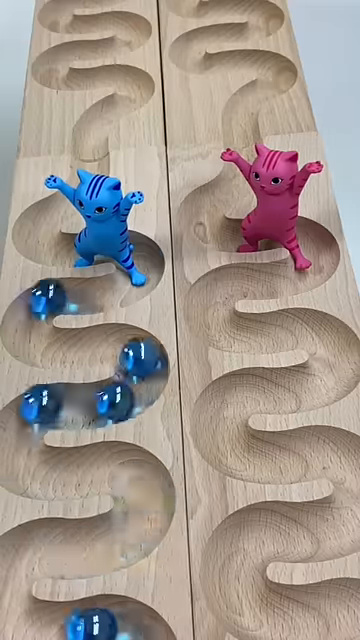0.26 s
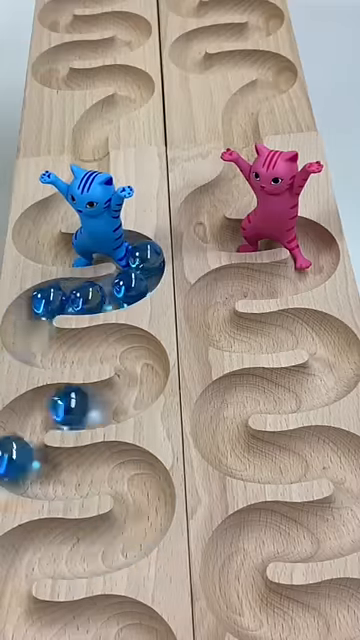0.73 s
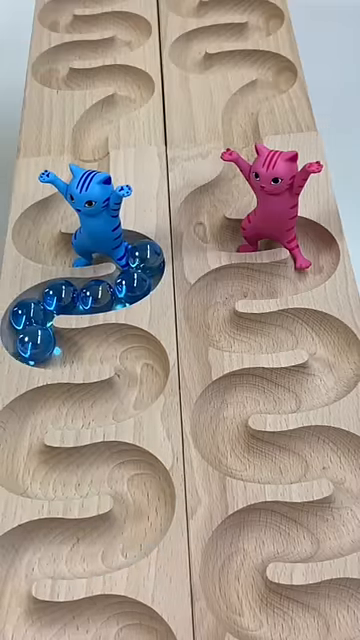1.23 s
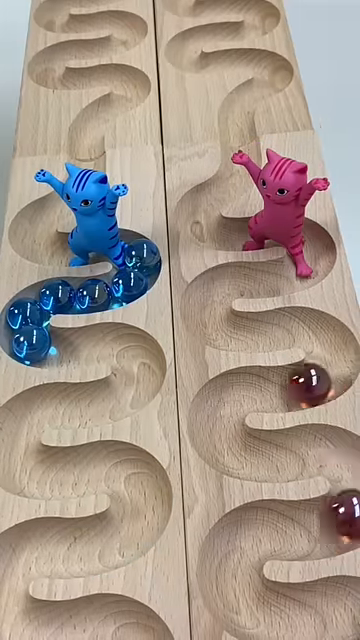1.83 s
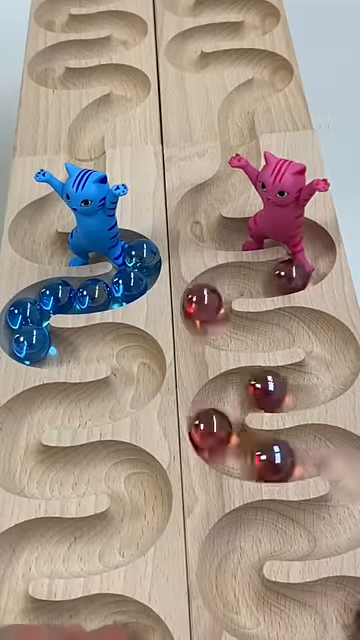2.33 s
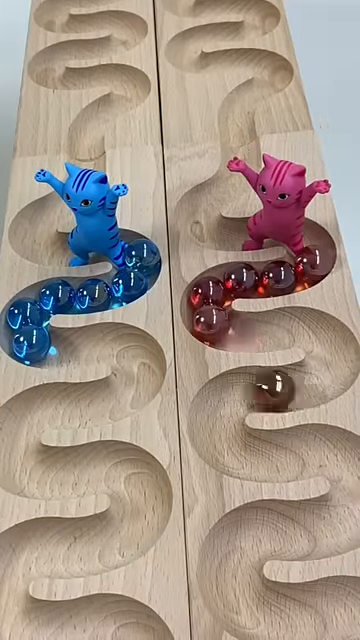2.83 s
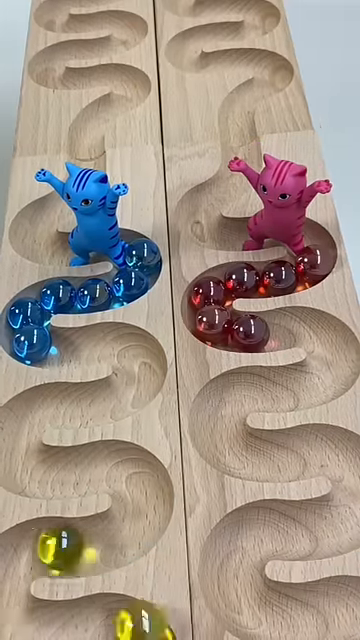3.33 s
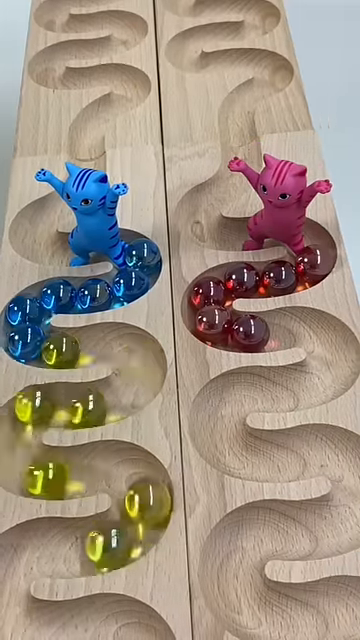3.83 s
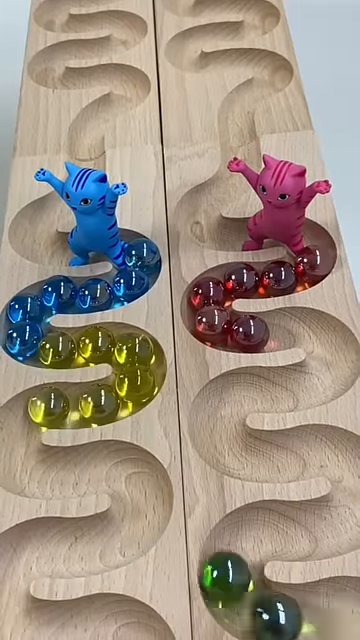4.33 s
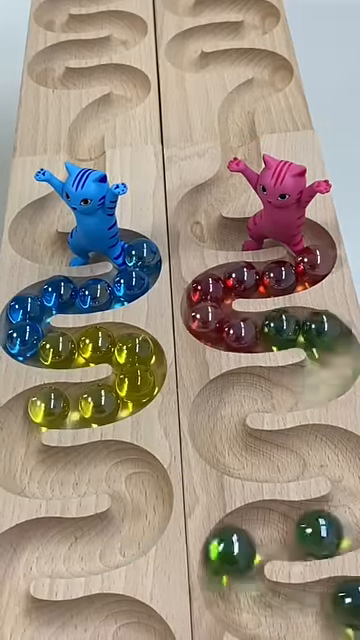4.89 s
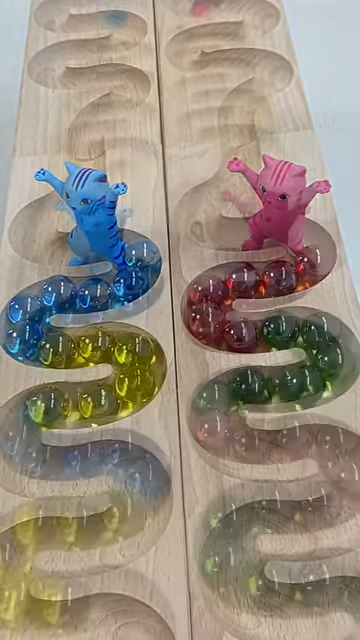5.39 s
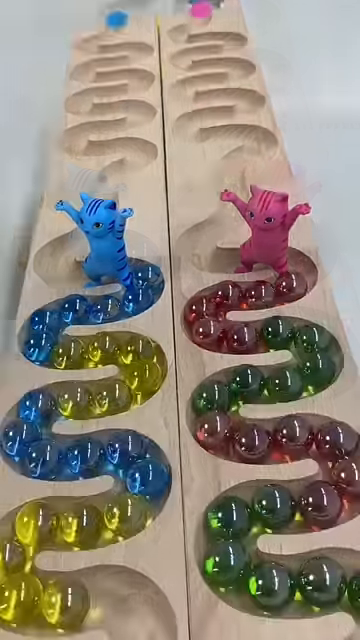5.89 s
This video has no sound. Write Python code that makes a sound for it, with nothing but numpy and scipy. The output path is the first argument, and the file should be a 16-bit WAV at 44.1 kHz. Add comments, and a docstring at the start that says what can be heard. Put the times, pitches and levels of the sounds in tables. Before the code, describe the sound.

Glass marbles roll down snaking grooves in wooden boards, making a hollow woody rumble covered in dense, bright chatter. Sharp knocks against groove walls and small glass-on-glass clacks punctuate each run. The rolling stops briefly after the first run and dips again midway, then resumes. Four heavier slaps come near the end before it fades to soft room tone with faint low hums. Close stereo microphone, small dry room.

```python
"""Glass marbles roll down grooves in two wooden boards, left and right in turn, rumbling and chattering.
Random clicks stand for the wood grain and small hops; they ring the boards' bending modes and thin groove walls.
Knocks on the walls and clacks of glass on glass add cracks and decaying rings; four slaps come late.
The rolling then dies away into room tone with two short low hums. A close pair of microphone ports listens."""
import sys
import numpy as np
from scipy import signal
from scipy.fft import rfft, irfft, next_fast_len
from scipy.io import wavfile

SR = 44100
rng = np.random.default_rng(int(sys.argv[2]) if len(sys.argv) > 2 else 0)


def decibels_to_gain(level_db):
    """Convert a level in decibels to a linear amplitude gain (20 dB per decade)."""
    exponent = np.asarray(level_db, float) / 20
    return 10 ** exponent


def master_out(mix):
    """Clip the mix to full scale and print it as 16-bit PCM to the path in sys.argv[1]."""
    frames = np.transpose(np.atleast_2d(mix))
    ceiling = np.clip(frames, -1, 1)
    pcm = np.round(ceiling * 32767).astype(np.int16)
    wavfile.write(sys.argv[1], SR, pcm)


N = 271215

# Room tone while the marbles roll. Each row: frequency in Hz, relative density in dB.
ROOM_TONE = [(25, -54.5), (65, -48.5), (110, -16.5), (300, -18), (650, -22), (1500, -34.5), (14000, -53.5)]
# Deeper room tone at the end. Each row: frequency in Hz, relative density in dB.
LATE_TONE = [(18, -12), (130, -11), (330, -18), (1190, -36.5), (14000, -49.5)]
ROOM_TONE_DB, LATE_TONE_DB = -60, -58  # rms levels
TONE_TURN_S = 5.45  # middle of the crossfade between the two tones
# Likeness of left and right room tone. Each row: frequency in Hz, correlation from 0 to 1.
TONE_LIKENESS = [(200, 0.99), (1000, 0.99), (15000, 0.39)]
# Wavering hum in the first room tone: frequency in Hz, width in Hz, rms level in dB.
WAVERING_HUM = (111, 18, -58.5)
# Low hums at 56 Hz. Each row: start in seconds, end in seconds, peak level in dB.
LOW_HUMS = [(5.801, 5.95, -52), (5.987, 6.135, -50.5)]
# Decay of the small room. Each row: frequency in Hz, time to fall 60 dB in seconds.
ROOM_DECAY = [(200, 0.068), (2000, 0.02), (12000, 0.2)]

# Times when the right board is in play, else the left. Each row: start in seconds, end in seconds.
RIGHT_BOARD_SPANS = [(1.3, 3.01), (4.15, 7)]
# Bending modes shared by both boards. Each row: frequency in Hz, relative level in dB,
# time to fall 60 dB when struck in seconds.
BODY_MODES = [(208.4, -7.5, 0.039), (308.5, -3, 0.061), (377.2, -7.5, 0.096), (448.8, -6.5, 0.054),
              (650, -9, 0.058), (852.7, -15, 0.13), (1147, -5, 0.027), (1335, -11.5, 0.081),
              (2024, -3.5, 0.019), (2354, -13, 0.0075)]
# Short rings of the thin groove walls, a list for the left board and one for the right.
# Each row: nominal frequency in Hz, relative level in dB, time to fall 60 dB in seconds.
WALL_RINGS = [
    [(2590, 1.5, 0.0059), (3280, -1, 0.0073), (4910, 0.5, 0.0055), (5530, -9.5, 0.024), (6750, 5.5, 0.0077),
     (8000, -13.5, 0.011), (9790, -4.5, 0.012)],
    [(2998, -2, 0.017), (3307, 3, 0.0037), (4070, 4, 0.003), (5630, 7.5, 0.0034), (6240, -3.5, 0.01),
     (8620, -4, 0.0067), (9320, -1, 0.012), (11900, -11.5, 0.0084)],
]

# Hard blows on a groove wall. Each row: start in seconds, knock drive in dB,
# ring frequency of the spot struck in Hz, drive of that ring in dB, drive of the high rings in dB.
BLOWS = [(0.1493, -11.5, 5530, -1, -4.5), (0.1774, -17.5, 5530, -8.5, -15.5),
         (1.3356, -20.5, 6100, -14, -17.5), (1.3435, -22, 5200, -18, -32.5),
         (1.5275, -11.5, 5360, -6, -4.5), (1.5648, -15.5, 6530, -3, -2), (1.589, -19.5, 5630, -5.5, -25.5),
         (1.6024, -20.5, 6530, -4, -8), (1.776, -19.5, 5630, -14, -14.5), (1.783, -22, 5150, -7, -16.5),
         (1.8214, -19.5, 5870, -13, -17.5), (2.1761, -15, 5740, -21.5, -31.5),
         (2.1834, -25, 5630, -15, -27.5), (3.0907, -20, 6750, -17, -13), (3.097, -21.5, 5910, -6.5, -10.5),
         (3.307, -12, 5780, 1.5, -9), (3.3116, -9.5, 5570, -15.5, -15), (3.327, -25, 5800, -5, -10.5),
         (3.335, -22, 6860, -15.5, -11.5), (3.351, -27, 5730, -2, -2.5), (3.3649, -18, 5680, -6.5, -34),
         (3.3819, -13, 5900, -1.5, -6.5), (3.4218, -21.5, 5670, -12, -26.5),
         (3.4424, -15, 5530, -10.5, -14.5), (3.4725, -23.5, 5720, -10.5, -21.5),
         (3.4797, -23, 5630, -13, -19.5), (4.132, -19.5, 6650, -16, -22), (4.1643, -19.5, 6580, -7, -18.5),
         (4.1761, -20, 6700, -5.5, -12.5), (4.195, -22, 6500, -11.5, -21.5),
         (4.2059, -24.5, 6480, -12, -23), (4.5938, -18, 5630, -7.5, -8.5), (4.6062, -17, 7030, -2, -26),
         (4.615, -19.5, 5630, -24, -20), (4.629, -21.5, 5530, -18, -24), (4.8123, -7, 4620, -2.5, 3.5),
         (4.9293, -5, 4240, -1, 1), (4.9939, -11.5, 4670, -5, 1), (5.03, -17, 4390, -11.5, -9.5)]
TICK_SLOPE, TICK_DB = 0.26, -26  # tick drive of a blow: dB per dB of high ring, dB at 0 dB high ring
# Marble clacks on marble. Each row: start in seconds, clack drive in dB, groove ring drive in dB.
CLACKS = [(0.5292, -25.5, -19.5), (0.5507, -33.5, -32), (0.5793, -26.5, -22), (0.604, -21, -23.5),
          (1.009, -31.5, -49), (1.039, -35.5, -45), (1.0514, -25.5, -45), (1.078, -25.5, -34),
          (1.4544, -28, -45), (1.4634, -32.5, -50), (1.909, -35, -26), (1.9939, -34.5, -28.5),
          (2.605, -24.5, -42), (2.677, -29, -45), (2.7075, -23, -20), (2.7259, -28, -29),
          (3.023, -28.5, -50), (3.0408, -25.5, -40), (3.0614, -25.5, -31), (3.838, -33, -45),
          (3.859, -31.5, -31), (3.97, -32.5, -48), (3.9826, -23, -60), (4.0483, -29, -47),
          (4.1013, -23, -37), (4.1208, -19.5, -22), (4.586, -29, -48), (4.88, -35.5, -47),
          (4.9095, -23.5, -39), (4.924, -25, -38), (5.05, -24, -14), (5.27, -35, -43), (5.308, -27, -34),
          (5.3891, -30.5, -41)]
CLACK_HZ, CLACK_HIGH_DB = 4800, -14  # ring favoured by a clack; its high rings relative to that ring

# Briskness of the rolling. Each row: time in seconds, pace in dB below or above full pace.
PACE = [(0, 0.5), (.62, -1), (.72, -3), (.9, -1), (1.09, -5), (1.14, -71), (1.32, -8.5), (1.55, -3),
        (2.05, -0.5), (2.4, -0.5), (2.54, -2), (2.62, 0), (2.76, -3), (2.9, -6), (3.02, -5), (3.13, -3),
        (3.21, -18.5), (3.28, -0.5), (4.05, -0.5), (4.25, -5), (4.4, -1), (4.46, -4.5), (4.72, -2),
        (5.34, -1.5), (5.45, -14), (5.75, -24), (5.85, -48)]
# Small soft ticks, some just before a louder blow. Each row: time in seconds, relative level in dB.
SOFT_TICKS = [(0.074, -20.5), (0.1924, -16), (0.224, -19.5), (0.251, -24), (0.317, -22.5), (0.382, -17),
              (0.468, -30.5), (0.501, -20.5), (0.794, -28), (0.819, -28), (0.875, -25), (0.897, -25),
              (0.9185, -21.5), (1.327, -26), (1.4472, -29), (1.611, -17.5), (1.639, -18.5), (1.644, -24),
              (1.703, -20.5), (1.7925, -16), (1.828, -23.5), (1.8793, -26), (1.9614, -24.5), (2.1102, -30),
              (2.143, -35), (2.25, -42.5), (2.3245, -26), (2.383, -28), (2.41, -22), (2.4268, -26),
              (2.463, -26), (2.6313, -20.5), (2.798, -29), (2.806, -32), (2.853, -34), (2.859, -23),
              (2.903, -37.5), (2.936, -42), (2.954, -35.5), (2.972, -40), (3.0045, -25), (3.254, -35),
              (3.288, -19), (3.553, -25.5), (3.7593, -28), (3.823, -32.5), (3.928, -25.5), (3.7168, -16),
              (3.89, -22.5), (4.275, -27), (4.332, -24.5), (4.362, -24.5), (4.3833, -25.5), (4.426, -23.5),
              (4.4796, -29.5), (4.519, -28.5), (4.5695, -35.5), (4.685, -24), (4.753, -24), (5.109, -28.5),
              (5.15, -23.5), (5.285, -28), (5.402, -33)]
# Singing of the groove under rolling glass: frequency in Hz, time to fall 60 dB in seconds, mean gain in dB.
GROOVE_SONG = (3390, 0.01, -17.5)
RUMBLE_DB, CHATTER_DB, WHISPER_DB = -39.5, -49.5, -66  # drives at full pace
CHATTER_SLOPE = 3.23  # chatter dB per dB of pace: it dies faster than the rumble
STIR_DB, STIR_T60 = -40.5, 0.21  # rattling after a contact: dB relative to its knock, seconds to fall 60 dB

# Phase between the ports. Each row: frequency in Hz, lead of right over left in radians.
PORT_PHASE = [(300, 0), (3000, .15), (5200, -.4), (7000, -.2), (8700, -.7), (10600, -.45), (13600, -3.0)]
# Level between the ports. Each row: frequency in Hz, excess of left over right in dB.
PORT_LEAN = [(300, -.5), (1170, -1.8), (2000, -.4), (5000, .2)]


def evened(x):
    """Scales a signal to rms 1."""
    return x / np.sqrt(np.mean(x ** 2) + 1e-20)


def read(points, hz):
    """Reads a curve between its points along a logarithmic frequency axis."""
    f, value = np.transpose(points)
    return np.interp(np.log(hz + 1), np.log(f + 1), value)


def band(x, lo_hz, hi_hz):
    """Keeps one band of frequencies."""
    return signal.sosfilt(signal.butter(2, [lo_hz, min(hi_hz, SR / 2.1)], "band", fs=SR, output="sos"), x)


def ring(x, hz, t60):
    """A two-pole resonator: every click starts a decaying sine of about its own height."""
    r, w = np.exp(-np.log(1000) / (t60 * SR)), 2 * np.pi * hz / SR
    return signal.lfilter([0, np.sin(w)], [1, -2 * r * np.cos(w), r * r], x)


def glide(x, hz, t60):
    """Like ring, but the pitch follows the curve hz."""
    turn = np.exp(2j * np.pi * np.cumsum(hz) / SR)
    return (turn * signal.lfilter([1], [1, -np.exp(-np.log(1000) / (t60 * SR))], x / turn)).imag


def drift(per_s, count):
    """Slow random wander, one row each, with knots of rms 1 joined by straight lines."""
    knots = rng.standard_normal((int(N / SR * per_s) + 2, count)).T
    return np.array([np.interp(np.arange(N) / SR * per_s, np.arange(len(k)), k) for k in knots])


def tone(spectrum, db):
    """Soft room noise shaped in frequency, partly alike left and right."""
    frames, hz = N // 1024 + 5, np.fft.rfftfreq(4096, 1 / SR)
    a, b, c, d = rng.standard_normal((frames, len(hz), 4)).T
    same = np.clip(read(TONE_LIKENESS, hz), -1, 1)[:, None]
    left = a + 1j * b
    right = same * left + np.sqrt(1 - same ** 2) * (c + 1j * d)
    z = np.array([left, right]) * decibels_to_gain(read(spectrum, hz))[:, None]
    return decibels_to_gain(db) * evened(signal.istft(z, nperseg=4096, noverlap=3072)[1][:, :N])


def air():
    """Room tone with a narrow hum gives way to a deeper tone; two low hums sound over it."""
    t = np.arange(N) / SR
    late = np.clip((t - TONE_TURN_S) / 0.78 + .5, 0, 1)
    hz, width, db = WAVERING_HUM
    narrow_noise = ring(ring(rng.standard_normal(N), hz, 1.5 / width), hz, 1.5 / width)
    hum = .6 * np.sin(2 * np.pi * hz * t) + evened(narrow_noise)
    early_air = tone(ROOM_TONE, ROOM_TONE_DB) + decibels_to_gain(db) * evened(hum)
    out = early_air * (1 - late) + tone(LATE_TONE, LATE_TONE_DB) * late
    for start, end, db in LOW_HUMS:
        fade = np.clip(np.minimum(t - start, end - t) / 0.017, 0, 1)
        out += decibels_to_gain(db) * fade * np.sin(2 * np.pi * 56 * t)
    return out


def room(x):
    """Sparse echoes of random sign, each band dying at its own speed, spread between the two ports."""
    size = SR // 2
    taps = np.zeros((2, size))
    at = np.arange(100, size - 20, 20) + rng.integers(0, 20, (2, (size - 101) // 20))
    np.put_along_axis(taps, at, rng.choice([-1., 1.], at.shape), 1)
    hz, t, z = signal.stft(taps, SR, nperseg=128)
    # the ports differ most in the middle frequencies
    z[1] *= read([(650, .2), (1200, 5.5), (2500, 2.1), (5000, 1.1), (12000, .2)], hz)[:, None]
    tail = signal.istft(z * decibels_to_gain(-60 * t / read(ROOM_DECAY, hz)[:, None]), SR, nperseg=128)[1]
    mid, side = tail / np.linalg.norm(tail[0])
    return signal.fftconvolve(x[None], np.array([mid + side, mid - side]), axes=1)[:, :N]


def board_at(s):
    """1 while the right board is in play, else 0."""
    return sum((s >= a) & (s < b) for a, b in RIGHT_BOARD_SPANS)


def contacts():
    """All loud contacts: seconds, knock dB, ring Hz, ring dB, high ring dB, tick dB."""
    # the crisper the blow, the louder its glass tick
    hard = [(*row, TICK_SLOPE * row[-1] + TICK_DB) for row in BLOWS]
    return hard + [(s, db, CLACK_HZ, ring_db, ring_db + CLACK_HIGH_DB, db) for s, db, ring_db in CLACKS]


def burst(count, t60):
    """Noise that starts at once and dies away."""
    return rng.standard_normal(count) * decibels_to_gain(-60 * np.arange(count) / SR / t60)


def blows():
    """Each contact kicks the body and its board's walls, and cracks; slaps rattle louder and ring less."""
    out, thumps = np.zeros(N + 4000), np.zeros(N)
    t = np.arange(4000) / SR
    for s, knock_db, ring_hz, ring_db, high_db, tick_db in contacts():
        at, sound = round(s * SR), np.zeros(len(t))
        slap = ring_hz < 4800 and ring_db > -22
        for hz, db, t60 in WALL_RINGS[board_at(s)]:
            near_db = -min(14, ((hz - ring_hz) / 250) ** 2)  # the spot struck favours nearby rings
            drive_db = knock_db if hz < 4000 else ring_db + near_db if hz < 7500 else high_db
            detune, phase = 1 + 0.016 * rng.standard_normal(), rng.random()
            sound += decibels_to_gain(db + drive_db - 60 * t / t60) * np.sin(2 * np.pi * (hz * detune * t + phase))
        sound *= (1 - np.exp(-t / 0.0001)) * decibels_to_gain(-15 if slap else 0)  # the contact takes a moment
        crack = burst(count=len(t), t60=0.016) * np.minimum(t / 0.00061, 1)
        tick = crack * decibels_to_gain(-60 * t / 0.017)  # glass on glass is the shortest contact
        sound += decibels_to_gain(knock_db + 1.0) * np.roll(band(crack, 550, 6200), 30)
        sound += decibels_to_gain(ring_db - 7.5) * band(crack, 3216, 8100)
        sound += decibels_to_gain(high_db - 9.0) * band(crack, 8200, 11000)
        sound += decibels_to_gain(tick_db + 10.5) * band(tick, 10500, 15000)
        rattle = band(burst(count=len(t), t60=0.11), 2000, 5500 if slap else 8000)
        sound += decibels_to_gain(ring_db - (7 if slap else 24)) * rattle
        fizz = band(burst(count=len(t), t60=0.23), 6000, 13000)  # faint and high, dying away after the contact
        sound += decibels_to_gain(tick_db - 17.5) * fizz
        out[at:at + len(t)] += sound
        thumps[at + 70] = decibels_to_gain(0.71 * knock_db - 17.0)
    body = sum(decibels_to_gain(db) * ring(thumps, hz, t60) * (-1) ** k for k, (hz, db, t60) in enumerate(BODY_MODES))
    return out[:N] + body


def clicks(per_s, spread_db):
    """Random contacts of either sign and uneven size, scaled to rms 1."""
    size = decibels_to_gain(spread_db * np.minimum(rng.exponential(1, N), 3))
    return evened(size * (rng.random(N) < per_s / SR) * rng.choice([-1., 1.], N))


def stirred(t):
    """Every loud contact sets neighbouring marbles rattling for a while."""
    return sum(decibels_to_gain(db + STIR_DB - 60 * abs(t - s) / STIR_T60) * (t > s) for s, db, *_ in contacts())


def small_ticks(chatter):
    """Random small hops and the soft ticks: each scuffs, then skitters, and harder ones are brighter."""
    hits = clicks(per_s=230, spread_db=5.5) * chatter * decibels_to_gain(-9.5)
    for at, db in SOFT_TICKS:
        hits[round(at * SR)] = decibels_to_gain(db)
    t = np.arange(1500) / SR
    fall = decibels_to_gain(-60 * t / 0.0067) + decibels_to_gain(-21.0 - 60 * t / 0.031)
    scuff = signal.oaconvolve(abs(hits), fall)[:N]
    rough = scuff * rng.choice([-1., 1.], N)
    bright = rough * (scuff.clip(0) / decibels_to_gain(-31.0)) ** 0.5
    return band(rough, 600, 3900) + band(bright, 3000, 7000)


def rolling():
    """Wood grain under rolling glass rumbles in the body and rings the walls; small ticks lie on top."""
    t = np.arange(N) / SR
    pace_db = np.interp(t, *np.transpose(PACE), right=-80)
    rumble = clicks(per_s=2500, spread_db=3.5) * decibels_to_gain(RUMBLE_DB + pace_db)
    rumble = band(rumble, 100, 3500)  # wood grain is blunt
    chatter = decibels_to_gain(CHATTER_DB + CHATTER_SLOPE * pace_db) + stirred(t)
    # smooth rolling whispers even when the bouncing has stopped
    whisper = decibels_to_gain(WHISPER_DB + .5 * pace_db + 3.3 * drift(per_s=42, count=1)[0]) * rng.standard_normal(N)
    # rough, fast rolling is brighter
    lively_db = np.clip(20 * np.log10(chatter) - RUMBLE_DB - pace_db + 15.0, -30, 8)
    clumps = decibels_to_gain(4.5 * drift(per_s=60, count=1)[0])  # contacts come in bunches
    grain = clicks(per_s=1300 * decibels_to_gain(2.4 * pace_db) + 40, spread_db=5.0)  # sparser when slow
    grain = grain * clumps * chatter + whisper
    blunt = band(grain, 100, 4600)  # the low rings feel only the slow part of each contact
    ticks = small_ticks(chatter)

    out = decibels_to_gain(4.0) * band(blunt, 700, 4100) + decibels_to_gain(-8) * ticks
    song_hz, song_t60, song_db = GROOVE_SONG
    song = ring(blunt + .5 * ticks, song_hz, song_t60)
    out += decibels_to_gain(song_db + 3 * drift(per_s=12, count=1)[0]) * song

    place = decibels_to_gain(1.8 * drift(per_s=9, count=len(BODY_MODES)))  # moving marbles drive other modes
    load = .045 * drift(per_s=7, count=len(BODY_MODES))  # the moving weight bends each mode's pitch
    for k, (hz, db, t60) in enumerate(BODY_MODES):
        drive = rumble * place[k] * decibels_to_gain(lively_db * hz / 3400 - 21.0) + decibels_to_gain(-44) * ticks
        out += (-1) ** k * decibels_to_gain(db) * glide(drive, hz * (1 + load[k]), 0.73 * t60)

    spot = 1 + .3 * drift(per_s=71, count=8)  # how strongly ticks drive each ring wanders
    for side, walls in enumerate(WALL_RINGS):
        for k, (hz, db, t60) in enumerate(walls):
            octaves = np.log2(hz / 3000)  # soft contacts ring the high modes less
            drive = decibels_to_gain(-10.5 * octaves - 21.5) * (blunt if hz < 4600 else grain)
            drive += decibels_to_gain(-6 * octaves - 23.0) * ticks * spot[k]
            out += decibels_to_gain(db) * ring(drive * (board_at(t) == side), hz, t60)
    return out


def scene():
    """Both boards sound directly and through the room, over the room tone."""
    boards = band(blows() + rolling(), 120, SR)  # small boards radiate no deep bass
    return boards + decibels_to_gain(-14) * room(boards) + air()


def band_limit(x):
    """A steep low-pass at the top of the band."""
    return signal.sosfilt(signal.butter(12, 16990, fs=SR, output="sos"), x)


def record(dry):
    """The ports differ in level and phase by frequency; both ends roll off and peaks are rounded."""
    size = next_fast_len(N)
    hz = np.fft.rfftfreq(size, 1 / SR)
    phase = np.exp(.5j * read(PORT_PHASE, hz) * np.array([[-1], [1]]))
    lean = decibels_to_gain(.5 * read(PORT_LEAN, hz) * np.array([[1], [-1]]))
    treble_end = 1 / np.sqrt(1 + (hz / 15500) ** 24)
    bass_end = 1 / np.sqrt(1 + (45 / (hz + 1)) ** 4)
    heard = irfft(rfft(dry, size) * phase * lean * treble_end * bass_end, size)[:, :N]
    return band_limit(np.tanh(heard))


dry = scene()
out = record(dry)
master_out(out)
```